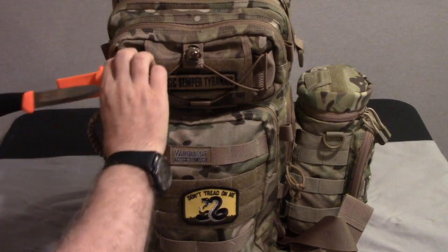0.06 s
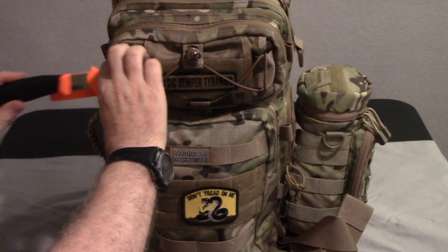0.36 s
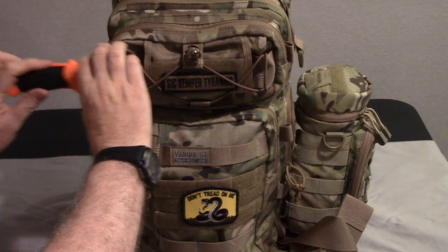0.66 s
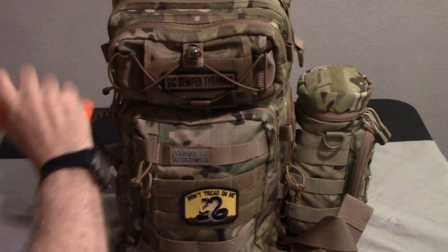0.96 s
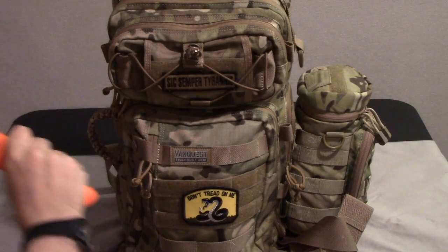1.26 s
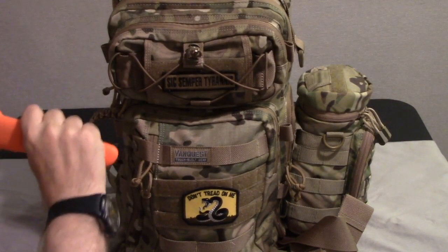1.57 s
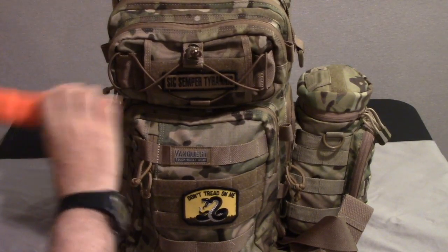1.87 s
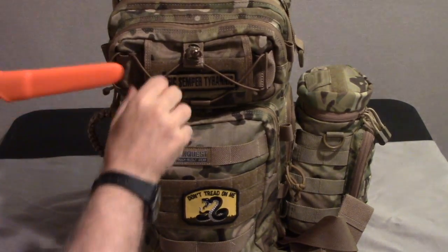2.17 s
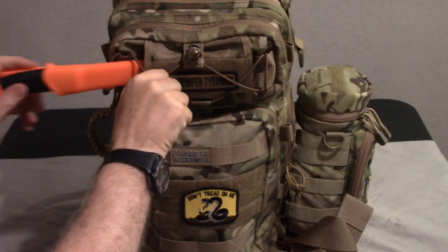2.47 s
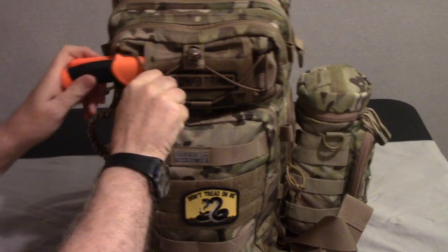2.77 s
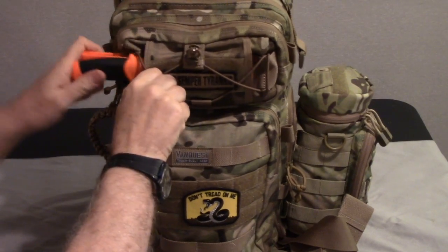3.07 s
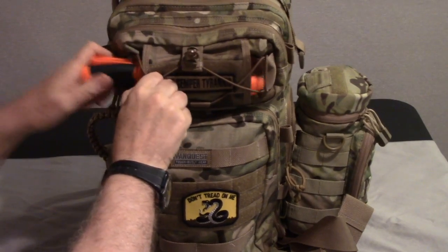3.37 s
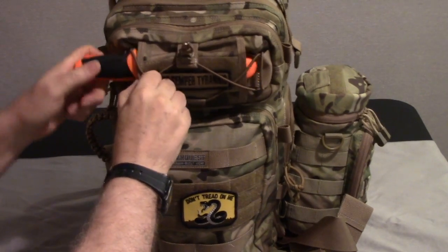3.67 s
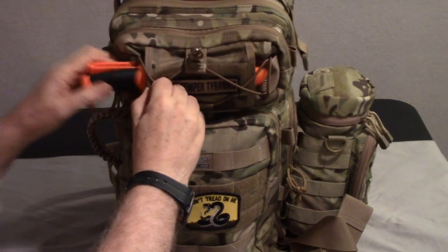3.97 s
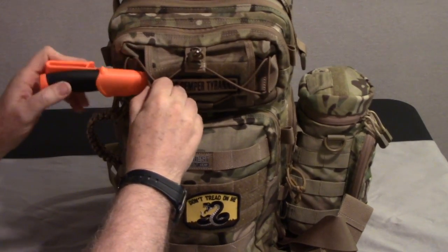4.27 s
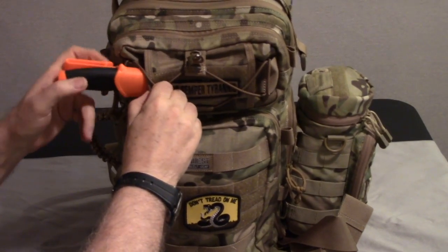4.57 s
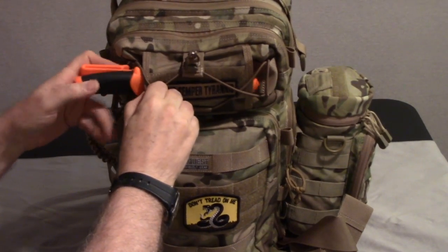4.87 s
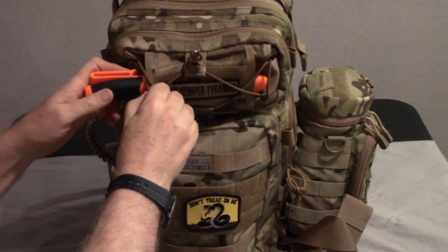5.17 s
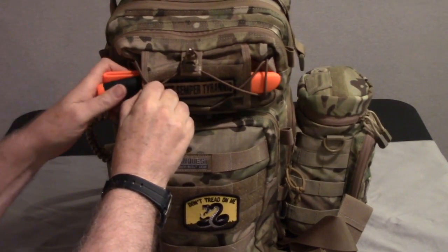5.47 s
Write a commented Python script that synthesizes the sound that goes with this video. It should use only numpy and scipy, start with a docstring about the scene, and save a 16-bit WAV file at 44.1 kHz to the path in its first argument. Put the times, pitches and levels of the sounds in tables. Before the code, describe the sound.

A faint, steady hum fills a small room, and everything is heard from close by. For the first second a steel knife blade scrapes into a hollow plastic sheath, knocking lightly on the inner wall several times between 0.3 and 0.9 seconds. It latches with a firm click at about 1.1 seconds. A quieter spell follows, with a few light brushes and a small bump near 2.3 seconds. From about 2.5 seconds the sheath is worked through the cord and webbing of a nylon pack. The weave rasps over the plastic in short, uneven strokes, with soft low rustle, bumps and brief zips. At about 3.1 seconds it snaps hard against the sheath, the loudest sound. The scratching strokes go on, with a knock near 3.9 seconds and little zips between 4.1 and 4.8. They weaken over the last second, with a light hollow bump around 5.4 seconds.

```python
"""A faint hum fills a small furnished room, heard from close by in mono.
First a knife is pushed into its hollow plastic sheath: the blade scrapes, knocks on the inner
wall and latches at about 1.1 s. After a quieter spell the sheath is worked through the cord and
webbing of a nylon pack. The weave rasps over the plastic in strokes, with bumps and short zips,
and snaps hard against it at about 3.1 s. The strokes go on, then fade over the last second."""
import sys
import numpy as np
from scipy import signal
from scipy.fft import rfft, irfft
from scipy.io import wavfile
from scipy.ndimage import uniform_filter1d

SR = 44100
rng = np.random.default_rng(int(sys.argv[2]) if len(sys.argv) > 2 else 0)


def dump_mix(stems):
    """Bounce the given channels to the path in sys.argv[1] as a 16-bit WAV at rate SR."""
    frames = np.atleast_2d(stems).T  # one column per channel
    limited = np.clip(frames, -1, 1)  # hard clip at full scale
    pcm = np.round(limited * 32767).astype(np.int16)
    wavfile.write(sys.argv[1], SR, pcm)


N = 252693
T = np.arange(N) / SR
HZ = np.maximum(np.arange(N // 2 + 1) * SR / N, 1)


def undb(db):
    """Turn decibels into a number to multiply by."""
    return 10 ** (np.asarray(db) / 20)


def unit(x):
    """Scale a sound to an average power of 1."""
    return x / np.sqrt(np.mean(x ** 2))


def colour(points):
    """Join (pitch_hz, level_db) points into a gain for every frequency."""
    hz, db = np.transpose(points)
    return undb(np.interp(np.log(HZ), np.log(hz), db))


def shape(x, gain):
    """Turn each frequency up or down by its gain."""
    return irfft(rfft(x) * gain, N)


def ring(x, hz, width_hz):
    """Make a sound ring at one pitch; a narrower width rings longer."""
    g, k = np.tan(np.pi * min(hz, SR / 2 - 100) / SR), width_hz / hz
    return signal.lfilter([g * k, 0, -g * k], [1 + g * k + g * g, 2 * g * g - 2, 1 - g * k + g * g], x)


def soften(x, hz, order):
    """Turn down the treble above hz."""
    return signal.sosfilt(signal.butter(order, min(hz, SR / 2 - 100), fs=SR, output="sos"), x)


def wander(rate_hz):
    """A smooth random wobble, about 1 in size."""
    step = int(SR / rate_hz)
    stairs = np.repeat(rng.standard_normal(N // step + 1), step)
    return unit(uniform_filter1d(stairs, step)[:N])


def background():
    """A wavering hum over steady room noise and hiss."""
    # tones of the hum: pitch_hz, level_db
    tones = [(49.2, -62.5), (147.6, -54)]
    # tone colour of the room noise: pitch_hz, relative_db
    air = [(15, -36), (25, -11.5), (53, -11), (75, -8.5), (147, -6), (188, -11.5), (266, -10), (368, -15),
           (432, -11.5), (495, -24), (613, -17.5), (1080, -21), (1230, -21.5), (1750, -24), (15500, -34)]
    hum = np.zeros(N)
    for hz, db in tones:
        loudness = undb(db + 0.5 * wander(rate_hz=5.8))
        hum += loudness * unit(np.sin(2 * np.pi * hz * T + wander(rate_hz=6)))
    return hum + undb(-50) * unit(shape(rng.standard_normal(N), colour(air)))


def strokes(table, release_s=0.02):
    """Each stroke swells, holds and dies away; gives level and tilt (brightness) over time."""
    power, tilt = np.full(N, 1e-12), np.zeros(N)
    for full_grip_s, swell_s, hold_s, level_db, tilt_db in table:
        early_s = np.maximum(full_grip_s - T, 0)
        late_s = np.maximum(T - full_grip_s - hold_s, 0)
        share = (undb(level_db) * np.exp(-early_s / swell_s - late_s / release_s)) ** 2
        power += share
        tilt += share * tilt_db
    return 10 * np.log10(power), tilt / power


def slips(per_s, spread_db):
    """Surfaces catch and let go, making many tiny clicks of uneven size."""
    clicks = (rng.random(N) < per_s / SR) * rng.standard_normal(N)
    return clicks * undb(spread_db * rng.standard_normal(N))


def shell(x):
    """The plastic sheath rings at many pitches at once."""
    # ringing notes of the plastic: pitch_hz, width_hz, level_db
    notes = [(792, 166, 0), (1150, 72, -8), (1317, 135, -2.5), (1490, 110, -9.5), (1720, 75, 4),
             (2140, 110, -1), (2530, 350, -3.5), (2923, 197, 3.5), (3690, 740, -4), (4500, 140, -10),
             (5250, 190, -10), (7440, 140, -9)]
    return sum(undb(db) * ring(x, hz, width_hz) for hz, width_hz, db in notes)


def scrape(table, surface, firm_rumble_db, firm_stroke_db=-29.5):
    """Tiny slips rasp and ring the sheath; the pack and hands rumble under them."""
    level_db, tilt_db = strokes(table)
    clicks = slips(per_s=16000, spread_db=1.5)
    bass_cut = 1 / np.hypot(1, (540 / HZ) ** 4)
    rasp = unit(shape(0.91 * clicks + 0.74 * shell(clicks), colour(surface) * bass_cut))
    # fast, light strokes are brighter: tip the balance of five octaves around 2500 Hz
    octave, centres = np.log2(HZ / 2500), np.arange(-2, 3)
    tilted = sum(shape(rasp, np.interp(octave, centres, band)) * undb(tilt_db * centre)
                 for centre, band in zip(centres, np.eye(len(centres))))
    low_tone = colour([(60, -30), (150, -2), (330, -1.5), (520, 3), (700, 0), (1200, -34), (4000, -82)])
    rumble = unit(shape(slips(per_s=3000, spread_db=3), low_tone))
    rumble_db = firm_rumble_db + 0.43 * (level_db - firm_stroke_db) - tilt_db  # less in light strokes
    grip = undb(1.4 * wander(rate_hz=110))  # the grip keeps faltering
    return grip * (tilted * undb(level_db - 2) + rumble * undb(rumble_db))


def blade_scrape():
    """Steel rubs on plastic as the blade slides in."""
    # pushes of the blade: full_grip_s, swell_s, hold_s, relative_db, tilt_db_per_octave
    pushes = [(0.032, 0.016, 0.228, -55, -3), (0.273, 0.004, 0.048, -36.5, -2.3),
              (0.348, 0.012, 0.28, -40.5, -2.4), (0.681, 0.048, 0.06, -32.8, 1.2),
              (0.767, 0.024, 0.036, -32.2, 3), (0.946, 0.042, 0.024, -41, 3.4),
              (0.988, 0.009, 0.053, -45, 1.5), (1.082, 0.005, 0.006, -40, -0.3),
              (1.113, 0.006, 0.035, -36.5, 0.0)]
    # tone colour of steel on plastic: pitch_hz, relative_db
    steel = [(300, -24), (560, -4), (720, 3.5), (1000, -1), (2000, -4), (3500, -7), (5600, -2), (8200, -14),
             (10000, -11.5), (15000, -29)]
    return scrape(pushes, steel, firm_rumble_db=-48.5)


def knock(start_s, level_db, contact_hz, fade_s, air_hz, air_db, wall_hz, wall_db, thud_db):
    """A hit rattles briefly, ringing the sheath and the air in it; the pack or hand takes a thud."""
    t = T[:SR // 5]
    rattle = 0.37 * rng.standard_normal(len(t)) * undb(-60 * t / fade_s)
    blow = (t == 0) * 1.
    push = ring(rattle + 0.22 * blow, contact_hz, 2.35 * contact_hz)
    contact = soften(push, 2.85 * contact_hz, order=5) + 0.11 * push  # a softer hit is duller
    crack = unit(1.06 * contact + 2.04 * shell(contact))
    swing = soften(blow + 0.24 * rattle, 1.87 * contact_hz, order=3)
    air = unit(ring(swing, air_hz, 64) + 0.16 * ring(swing, 2.005 * air_hz, 135))
    # each spot on the wall has its own two notes, shorter where the grip damps them
    wall = unit(ring(swing, wall_hz, 3.7 / fade_s) + 0.24 * ring(swing, 1.515 * wall_hz, 13 / fade_s))
    thud = unit(soften(ring(swing, 320, 310), 450, order=2))
    sound = crack + undb(air_db) * air + undb(wall_db) * wall + undb(thud_db) * thud
    strength = np.sqrt(np.sum(sound ** 2) / (0.0091 * SR))  # as if packed into about 9 ms
    out, start = np.zeros(N + SR), int(start_s * SR)
    out[start:start + len(t)] = undb(level_db) * sound / strength
    return out[:N]


def sheath_bumps():
    """The sheath bumps the hand or pack, or cord snaps against it."""
    # hits from outside: start_s, level_db, contact_hz, fade_s, air_hz, air_db, thud_db
    hits = [ (.212, -37, 500, 0.069, 420, -16, 7), (1.432, -50, 3500, .027, 700, -16, -14),
            (2.2736, -28.5, 1750, .035, 643, -2, 2), (2.488, -38.5, 1800, .03, 700, 7, 1),
            (2.830, -39.5, 2000, .033, 636, -3, -2), (2.893, -27.5, 2000, .03, 660, -4, -18),
            (3.101, -9.5, 3930, 0.063, 640, -26, -20.5), (3.127, -18.5, 3700, .08, 594, -16, -26),
            (3.935, -32, 1800, .02, 490, 15, -23), (3.947, -26, 1940, .03, 505, 1, -13),
            (4.265, -42.5, 2020, .031, 754, 5, -8), (5.399, -32, 1800, .016, 810, 17, -8),
            (5.420, -26.5, 1190, 0.016, 842, 9, 1)]
    return sum(knock(*hit, wall_hz=1750, wall_db=-15, thud_db=thud_db) for *hit, thud_db in hits)


def blade_knocks():
    """The blade knocks hollowly on the inner wall and latches."""
    # hits from inside: start_s, level_db, contact_hz, fade_s, air_db, wall_hz, wall_db
    hits = [ (.306, -22, 1670, 0.031, -4.5, 2650, 3), (.311, -23.5, 1500, 0.06, 5, 1720, 16),
            (.3695, -32, 1300, .027, 3, 1720, -10), (.3915, -30.5, 1570, 0.043, 7, 1730, 6),
            (.491, -34.5, 1500, .034, 4, 1700, -1), (.518, -25, 1170, 0.019, 11, 1470, -12),
            (.524, -18.5, 3400, 0.032, -4.5, 1510, -3), (0.5711, -17.5, 2190, 0.032, 2, 2730, -8),
            (.890, -24.5, 2880, .026, -7.5, 2970, -9), (1.003, -35, 1300, .1, 1, 1660, 0),
            (1.101, -12, 1260, .015, 1, 1260, 1.5), (1.103, -16, 3260, 0.038, -1, 3430, -5.5)]
    # the note of the air inside sinks as the blade fills the sheath: time_s, pitch_hz
    air_note = [(.3, 830), (.57, 750), (1.1, 742)]
    out = np.zeros(N)
    for start_s, level_db, contact_hz, fade_s, air_db, wall_hz, wall_db in hits:
        air_hz = np.interp(start_s, *np.transpose(air_note))
        out += knock(start_s, level_db, contact_hz, fade_s, air_hz, air_db, wall_hz, wall_db, thud_db=-15)
    return out


def nylon_scrape():
    """The sheath rubs over hand and pack in strokes, and keeps creeping between them."""
    # strokes of the sheath: full_grip_s, swell_s, hold_s, relative_db, tilt_db_per_octave
    rubs = [(1.362, 0.01, 0.02, -50.5, 1), (1.744, 0.022, 0.001, -41.5, 3), (1.798, 0.009, 0.019, -45.3, 3),
            (1.889, 0.0085, 0.043, -41.8, 6), (2.521, 0.09, 0.074, -38.5, -2.5),
            (2.598, 0.018, 0.09, -34, -1.1), (2.699, 0.021, 0.033, -26, 0),
            (2.843, 0.052, 0.006, -40, -1.2), (2.91, 0.021, 0.023, -26.5, 0.0),
            (2.986, 0.017, 0.033, -32.2, -1.4), (3.057, 0.024, 0.044, -33.5, -1.5),
            (3.116, 0.005, 0.045, -28, 3.0), (3.177, 0.009, 0.02, -39.5, 3), (3.281, 0.01, 0.015, -25.5, 0),
            (3.351, 0.0077, 0.0095, -25.5, 0.2), (3.38, 0.007, 0.005, -31.2, -0.9),
            (3.425, 0.009, 0.038, -32.5, -1.2), (3.545, 0.021, 0.031, -28.5, 0.1),
            (3.597, 0.02, 0.059, -35, -0.5), (3.746, 0.029, 0.071, -28, -1.3),
            (3.94, 0.03, 0.039, -35, -1.5), (3.99, 0.017, 0.035, -26, 2), (4.046, 0.02, 0.004, -28.3, -1.6),
            (4.059, 0.01, 0.026, -34.5, 2.2), (4.1, 0.013, 0.047, -42, -3), (4.154, 0.008, 0.045, -29, 1.1),
            (4.421, 0.026, 0.033, -28.5, -2), (4.475, 0.008, 0.018, -44, -2.5),
            (4.572, 0.006, 0.059, -41, -2), (4.671, 0.016, 0.033, -34.5, -2.5),
            (4.801, 0.035, 0.043, -34, -2.5), (4.895, 0.016, 0.022, -33.9, -3),
            (5.057, 0.0089, 0.102, -43.5, -2.5), (5.297, 0.021, 0.11, -38.5, -2.5),
            (5.408, 0.014, 0.021, -32.5, -1.2), (5.444, 0.009, 0.021, -40.8, -3),
            (5.659, 0.052, 0.08, -48.5, 0.5)]
    creep = (2.28, 0.08, 3.5, -53.5, -0.2)  # one long, faint stroke
    # tone colour of nylon on plastic: pitch_hz, relative_db
    weave = [(180, -36), (300, 6), (480, -6.5), (830, -1), (1700, -3), (3000, -4.5), (5700, -4),
             (8000, -12.5), (10000, -12.5), (12400, -19.5), (15000, -32)]
    return scrape(rubs + [creep], weave, firm_rumble_db=-45)


def zips():
    """Fine ridges tick past an edge, so fast and unevenly that they make a hoarse, sliding note."""
    # edges zipping over the plastic: start_s, length_s, start_hz, end_hz, level_db
    slides = [ (1.879, .053, 3000, 3450, -38.5), (2.312, .01, 3550, 3150, -40),
              (2.392, .028, 3610, 3200, -38), (2.426, .055, 2850, 2680, -44),
              (2.672, 0.069, 3036, 3100, -34), (3.27, .045, 1602, 1900, -31.5),
              (4.146, .026, 2120, 2770, -30.5), (4.381, .059, 756, 1405, -33),
              (4.405, .06, 2510, 1642, -31.5), (4.661, 0.056, 1545, 1006, -35.5),
              (4.765, .047, 859, 1403, -37)]
    out = np.zeros(N)
    for start_s, length_s, start_hz, end_hz, level_db in slides:
        hoarseness = 0.1 + 0.56 * abs(np.log2(end_hz / start_hz))  # grows with the slide in pitch
        progress = np.linspace(0, 1, int(length_s * SR))
        pitch_hz = start_hz + (end_hz - start_hz) * progress
        phase = 2 * np.pi * np.cumsum(pitch_hz) / SR
        # many ridges, out of step with each other
        flutter = soften(rng.standard_normal((2, len(progress))), hoarseness * start_hz / 2, order=2)
        note = unit(flutter[0] * np.cos(phase) + flutter[1] * np.sin(phase))
        start = int(start_s * SR)
        out[start:start + len(note)] += undb(level_db) * np.sin(np.pi * progress) * note
    return out


def room(x, fade_s=0.15, echo_db=-14.5):
    """Nearby walls answer with a short, slightly dull echo."""
    t = T[:SR // 2]
    fade_in = np.clip(t / 0.0053 - 0.5, 0, 1)
    echo = rng.standard_normal(len(t)) * undb(-60 * t / fade_s) * fade_in
    echo = soften(echo, 13000, order=1)
    echo /= np.sqrt(np.sum(echo ** 2))
    return x + undb(echo_db) * signal.fftconvolve(x, echo)[:N]


def scene():
    """Knife, sheath and pack in the room, the same in both channels."""
    handling = blade_scrape() + nylon_scrape() + blade_knocks() + sheath_bumps() + zips()
    mono = room(handling) + background()
    return np.array([mono, mono])


def record(dry):
    """Clip any peak beyond full scale, then cut the highest treble."""
    treble_cut = signal.ellip(10, 0.2, 70, 15700, fs=SR, output="sos")
    return signal.sosfilt(treble_cut, np.clip(dry, -1, 1))


dry = scene()
out = record(dry)
dump_mix(out)
```